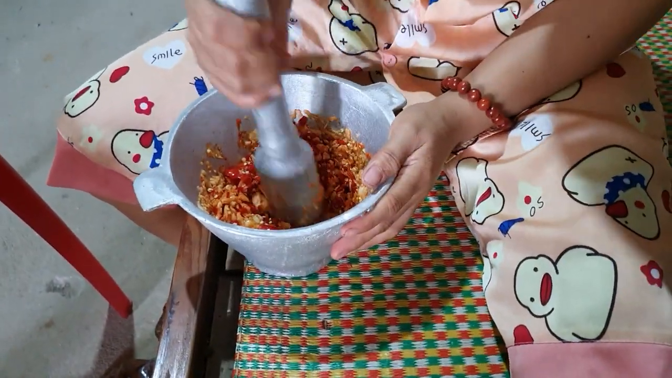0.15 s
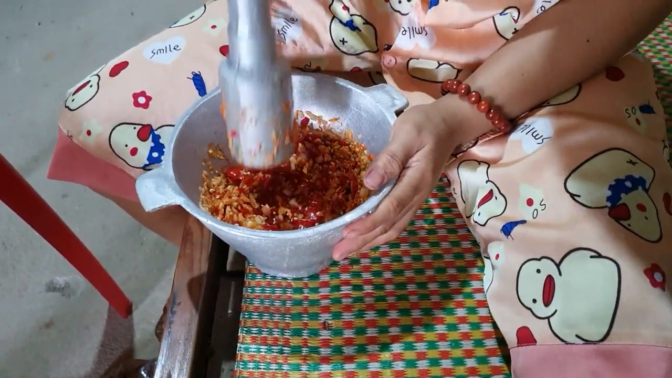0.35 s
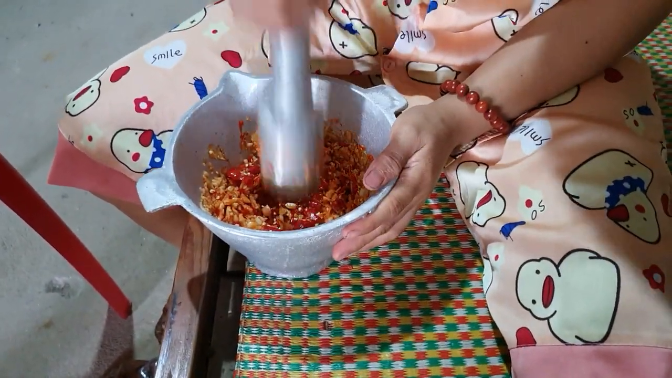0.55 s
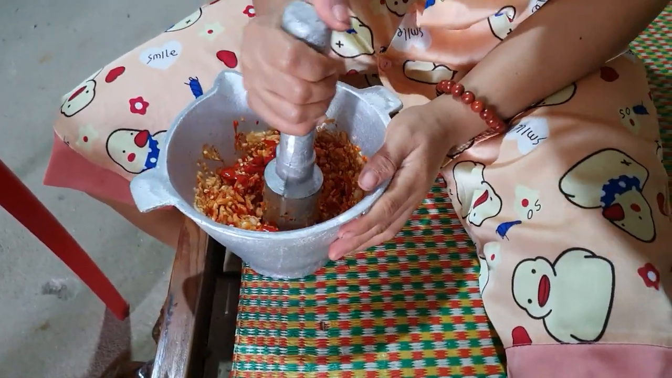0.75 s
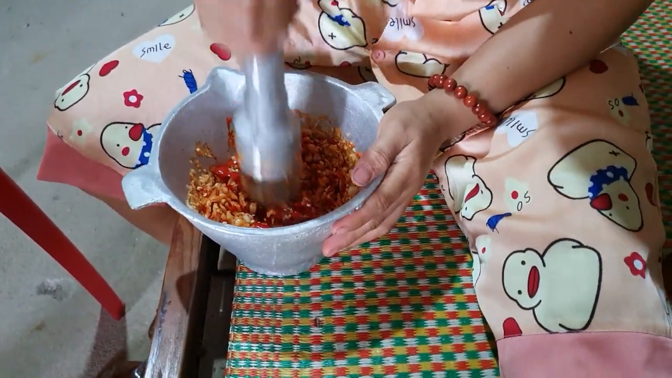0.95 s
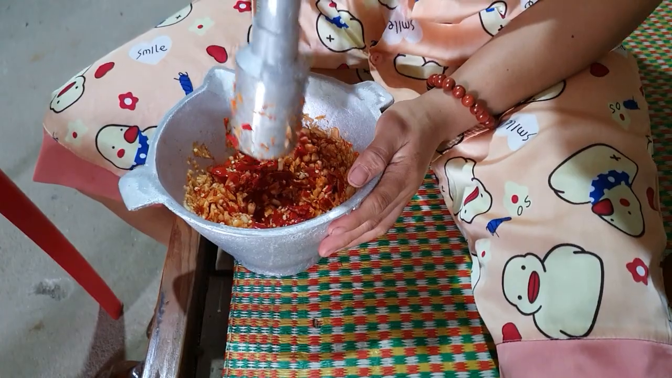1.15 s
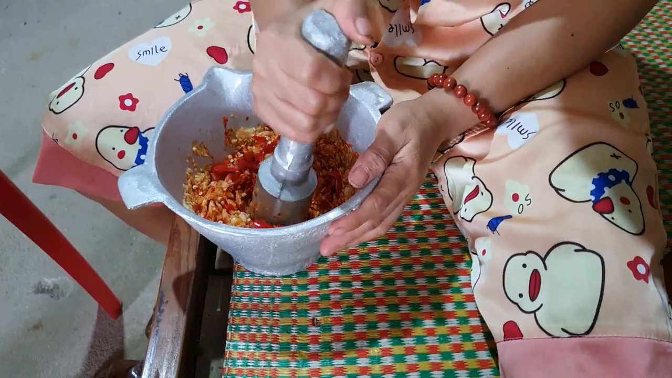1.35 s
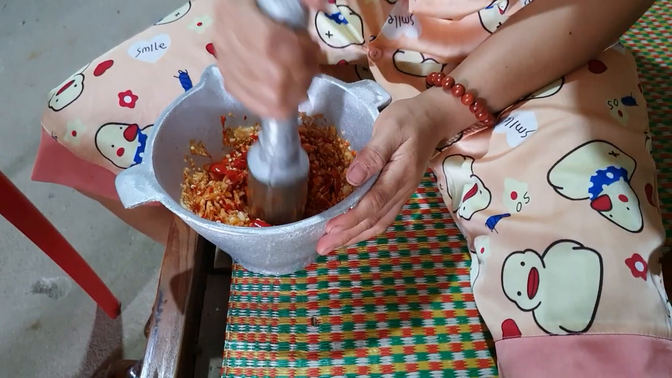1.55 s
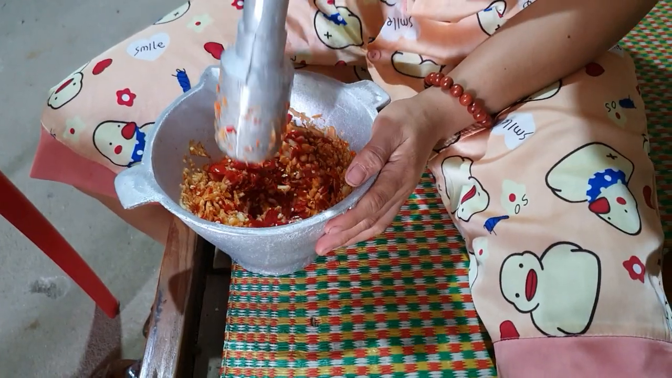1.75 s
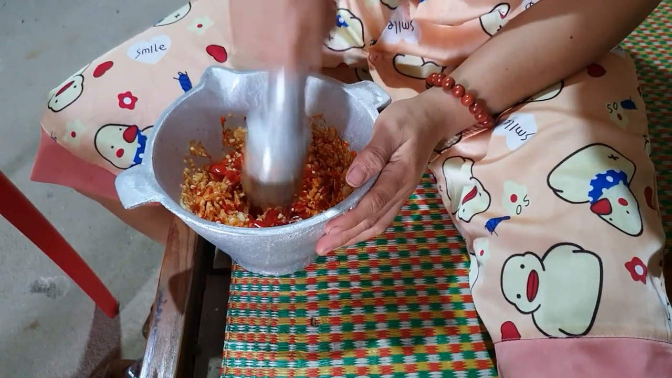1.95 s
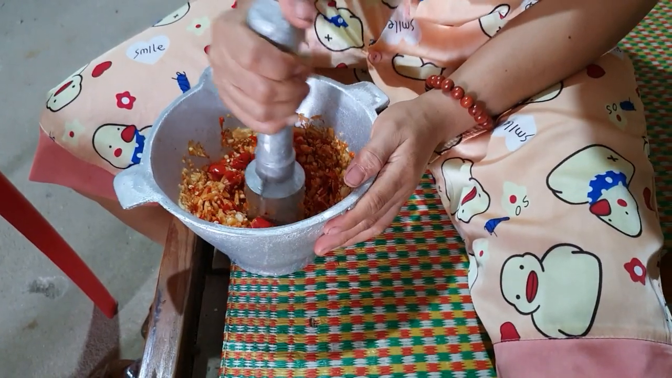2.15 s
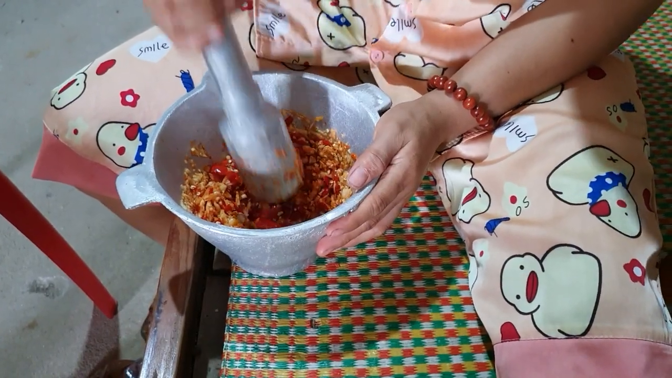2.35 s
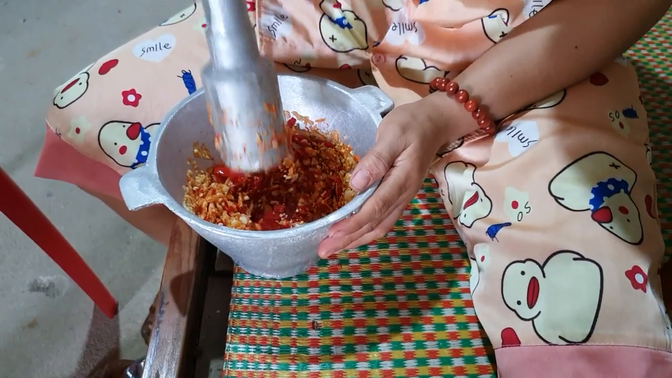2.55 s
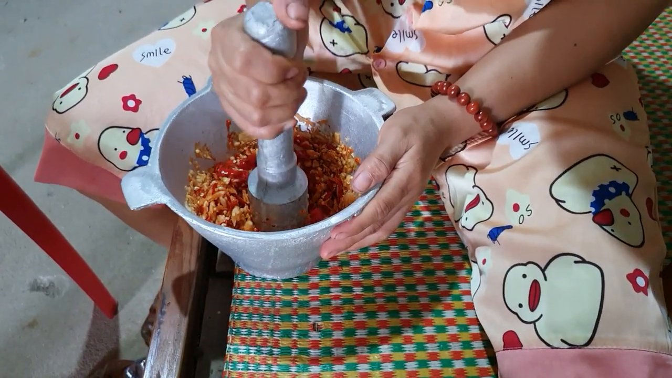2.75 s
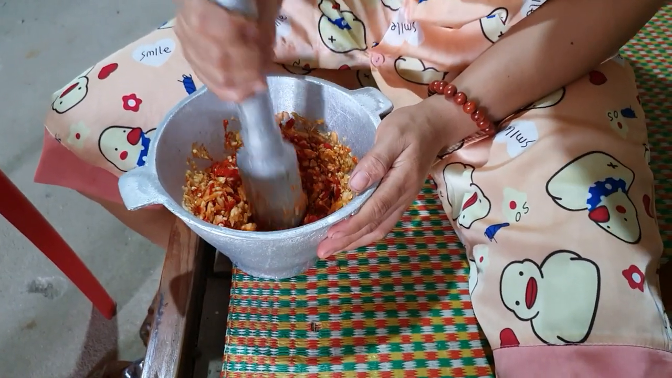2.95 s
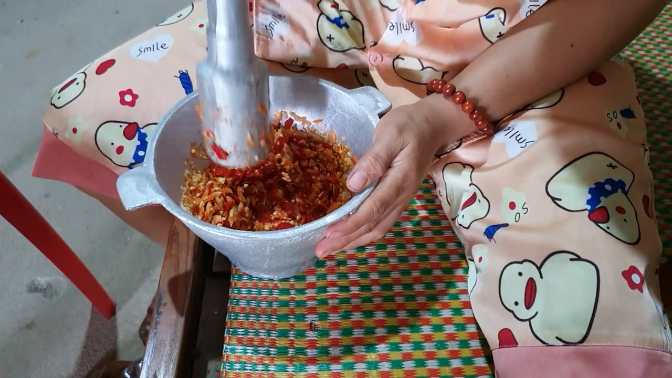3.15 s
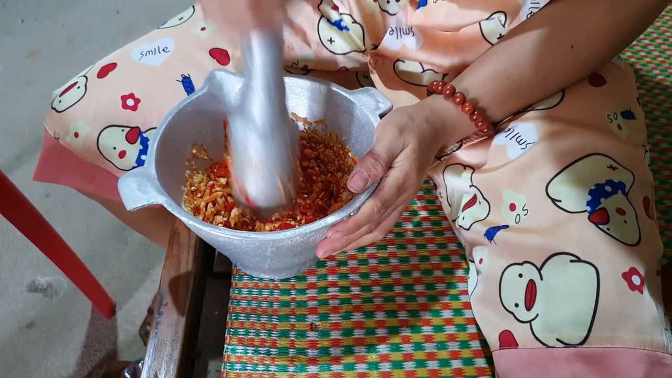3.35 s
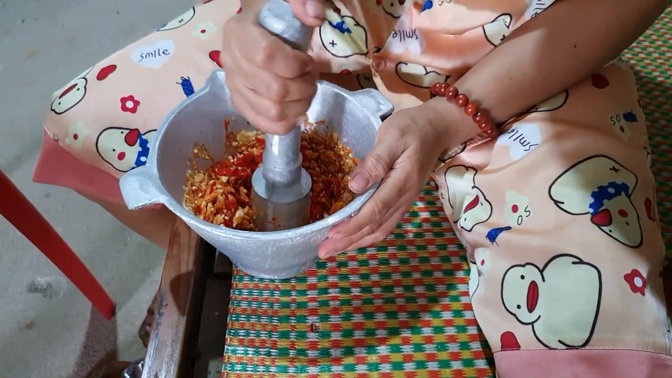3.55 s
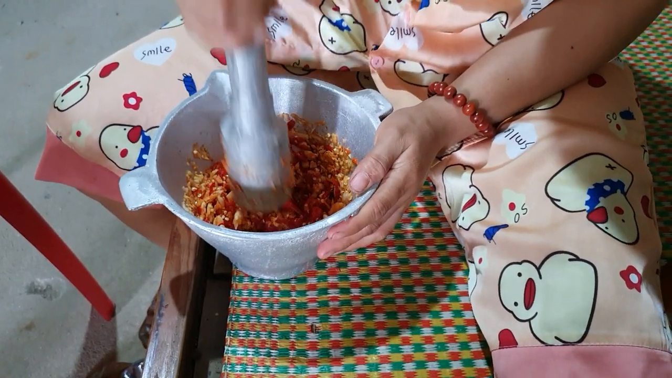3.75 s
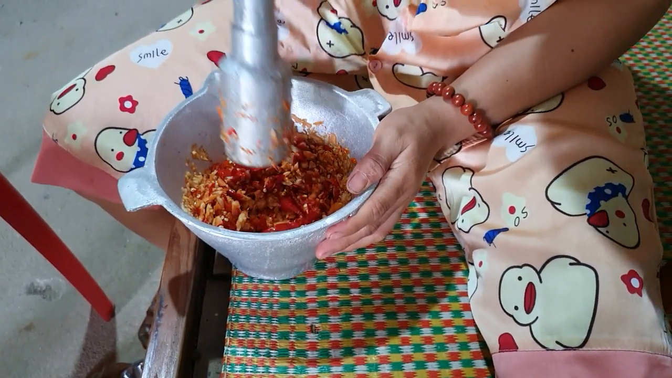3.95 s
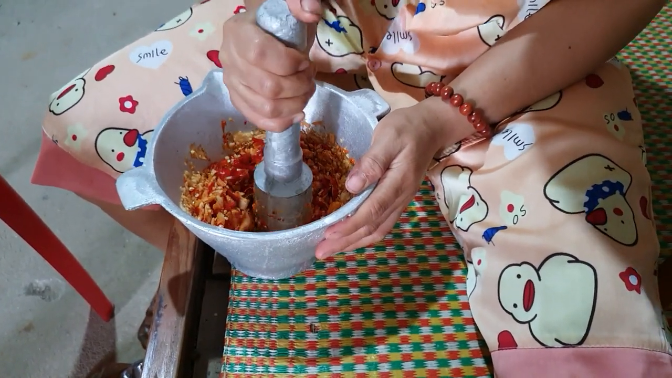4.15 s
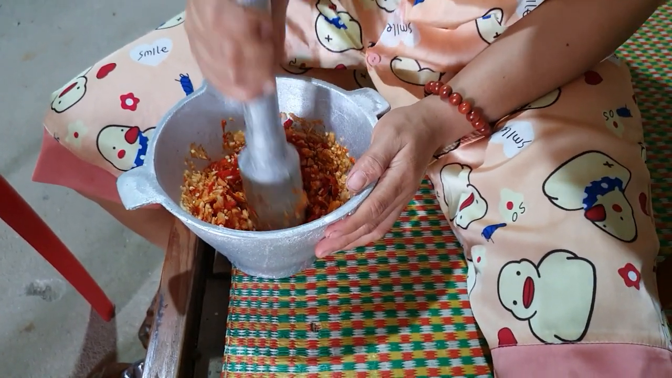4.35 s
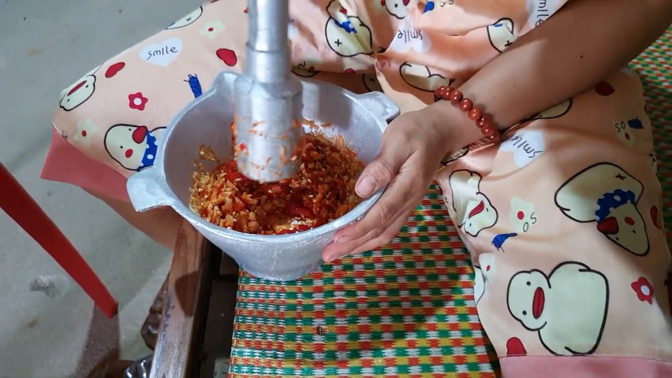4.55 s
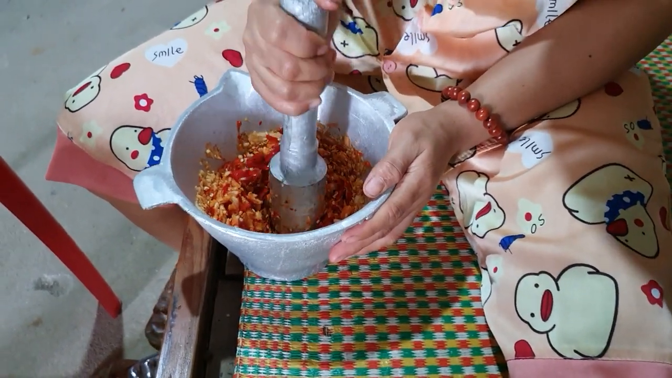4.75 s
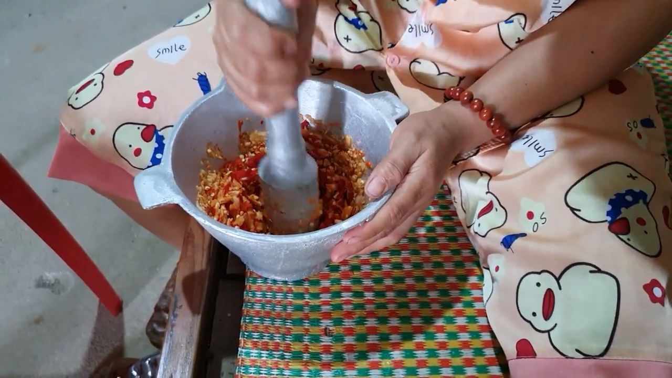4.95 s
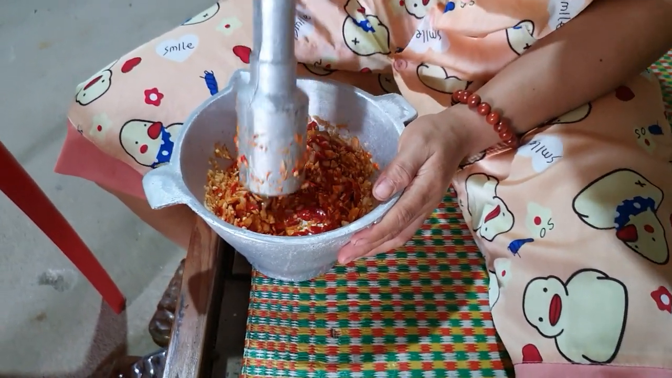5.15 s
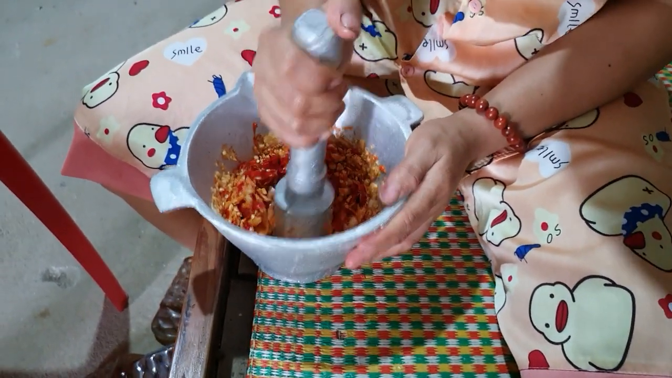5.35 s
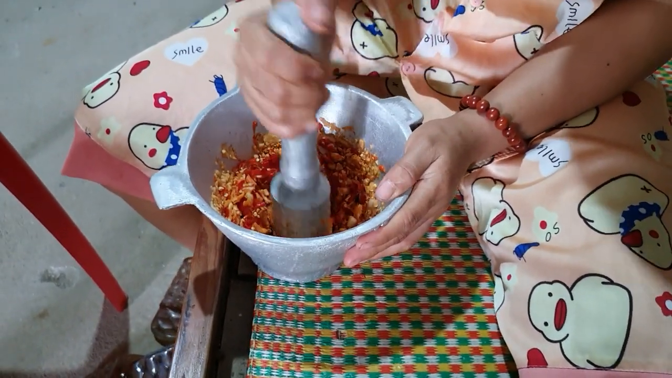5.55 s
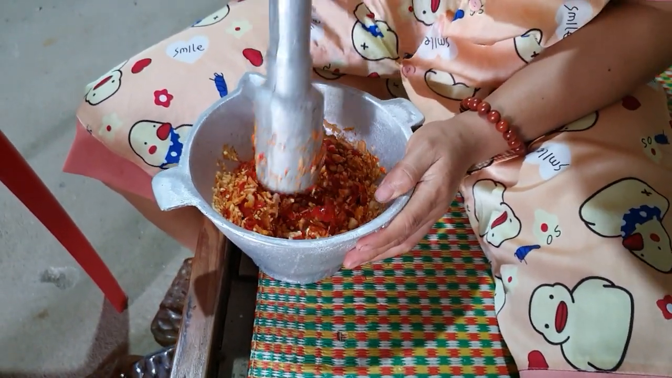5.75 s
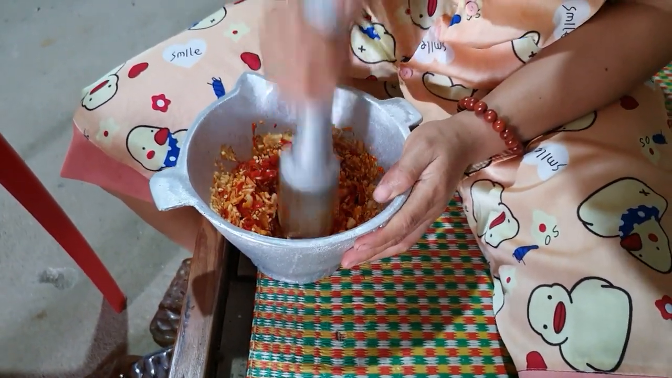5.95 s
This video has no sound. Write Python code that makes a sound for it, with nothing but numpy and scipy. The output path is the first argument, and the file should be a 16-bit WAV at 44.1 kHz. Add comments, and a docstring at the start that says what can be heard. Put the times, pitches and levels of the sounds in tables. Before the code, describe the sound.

A metal pestle pounds sticky paste in a cast metal mortar, heard closely in stereo in a bare room with a diffuse tail of roughly half a second. Soft air rush and deep bench rumble open, with small bumps around 0.3 s. A heavy dull thud lands at 0.6 s, followed by a wet smack. Blows at 1.3 and 2.0 s hit harder, with clank, bright scrape and brief metallic ring, the latter brightest. At 2.7 and 3.4 s the strokes are much quieter and cushioned, the second with a low hollow plop. Heavy squelching thuds come at 4.1 and 4.7 s, each trailed by sticky smacks. A soft, muffled blow with a plop follows at 5.3 s, a bench bump at 5.7 s, then a firm, crisp wet thud near 6.0 s as it ends. The loudest hits are slightly squashed, and the rumble swells around the strokes.

```python
"""Pounding chilli paste, small stereo

Bare room, mat-covered wooden bench: a metal pestle pounds paste in a hand-steadied cast metal mortar.
Each blow squelches (crowded noise bursts) and thuds (struck modes behind a cushioning low-pass);
where the paste is thin, the contact is hard and the metal rings (longer modes and a bright scrape).
Paste smacks and plops, and coloured noise makes the air's rush and the rumble of a bench that also bumps.
The room answers with a diffuse tail; the recorder's limiter ducks the loudest blows.
"""
import sys
import numpy as np
from scipy import signal
from scipy.fft import rfft, irfft, next_fast_len
from scipy.io import wavfile
from scipy.ndimage import uniform_filter1d, minimum_filter1d, map_coordinates

SR = 44100
rng = np.random.default_rng(int(sys.argv[2]) if len(sys.argv) > 2 else 0)


def bounce(signal):
    """Save signal as a 16-bit WAV file at the path given by the first command-line argument."""
    frames = np.transpose(np.atleast_2d(signal))
    limited = np.clip(frames, -1, 1)
    pcm = np.round(limited * 32767).astype(np.int16)
    wavfile.write(sys.argv[1], SR, pcm)


N = 268339  # samples


def amp(db):
    """Decibels as an amplitude factor."""
    return 10 ** (np.asarray(db) / 20)


def unit(x):
    """Scale to an RMS of one."""
    return x / np.sqrt(np.mean(x ** 2) + 1e-20)


def along(points, hz):
    """Interpolate (f/Hz, value) points on a log frequency axis."""
    f, value = np.transpose(points)
    return np.interp(np.log(hz + 1), np.log(f + 1), value)


def curve(rows):
    """Interpolate (t/s, value) rows to one value per sample."""
    return np.interp(np.arange(N) / SR, *np.transpose(rows))


def wobble(rate):
    """A smooth random curve with rate knots a second."""
    knots = rng.standard_normal(int(N * rate / SR) + 4)
    return map_coordinates(knots, [np.arange(N) * rate / SR])


def filtered(x, response):
    """Multiply the spectrum of x by a response of frequency."""
    n = x.shape[-1]
    padded = next_fast_len(n + 8192)
    spectrum = rfft(x, padded) * response(np.fft.rfftfreq(padded, 1 / SR))
    return irfft(spectrum, padded)[..., :n]


def stereo(pair, spectrum, alike):
    """Two unrelated signals become a coloured, partly alike left and right."""
    def mid_side_gains(hz):
        turn = np.arccos(np.clip(along(alike, hz), -1, 1)) / 2
        return amp(along(spectrum, hz)) * np.array([np.cos(turn), np.sin(turn)])

    mid, side = filtered(pair, mid_side_gains)
    return np.array([mid + side, mid - side])


def add(track, s, sound):
    """Mix a sound in at s seconds."""
    start = round(s * SR)
    track[:, start:start + sound.shape[-1]] += sound[..., :N - start]


def ring(modes, scatter_db, spread, chatter=0):
    """One second of decaying struck modes of alternating sign; chatter blurs each pitch by that share.

    The spread scatters the phase between left and right, in radians at 1 kHz.
    """
    t = np.arange(SR) / SR
    out = np.zeros((2, SR))
    for k, (hz, db, t60) in enumerate(modes):
        size, side = rng.standard_normal(2)
        lead = spread * side * np.sqrt(hz / 1000) * np.array([[1], [-1]])
        drift = np.cumsum(rng.standard_normal(SR)) * np.sqrt(2 * np.pi * chatter * hz / SR)
        decay = amp(db + scatter_db * size - 60 * t / t60)
        out += (-1) ** k * decay * np.sin(2 * np.pi * hz * t + drift + lead)
    return out


# Level of the background, moving rush and rumble together: t/s, level/dB
BACKGROUND = [(0, -46.5), (1.25, -42.5), (1.7, -48.5), (2.55, -51.5), (3.15, -51), (3.9, -43), (6.08, -44)]
# Colour of the rush in the air: f/Hz, level/dB
AIR = [(88, -29), (150, -8.5), (286, -8.5), (457, -1), (702, -7), (774, -9.5), (923, -5), (1260, -15.5),
       (1390, -15), (2550, -21), (4580, -25.5), (5570, -31.5), (8560, -35), (11300, -41), (16000, -53)]


def air():
    """A soft background rush whose low part swells and sinks a little."""
    alike = [(200, 0.31), (600, 0.72), (2000, 0.032), (8000, 0.036)]  # f/Hz, left-right likeness
    rush = unit(stereo(rng.standard_normal((2, N)), AIR, alike))
    low = filtered(rush, lambda hz: 1 / (1 + (hz / 700) ** 4))
    restless = low * amp(0.57 * wobble(18) + 1.3 * wobble(5.1))
    return amp(curve(BACKGROUND)) * (restless + rush - low)


SWELL_S = 0.062  # time for a swell to fall to 1/e on either side
SWELL_GROWS = 0.35  # dB of swell height per dB by which the thud outweighs the ring
DULL_DB = 32  # that outweighing in an ordinary blow


def swells(offset):
    """A smooth swell offset seconds from every blow, higher where the blow is deep and dull."""
    t = np.arange(N) / SR
    out = np.zeros(N)
    for s, thud_db, _, _, metal_db, *_ in BLOWS:
        height = amp(SWELL_GROWS * (thud_db - metal_db - DULL_DB))
        out += height * np.exp(-((t - s - offset) / SWELL_S) ** 2)
    return out


# The bench rumbles most as the arm tops its lift and again just after the blow.
RUMBLE_DB = 3.5  # over the mean background level, before the swells
RUMBLE_FOLLOWS = 0.88  # share of the background's level change that the rumble takes
LIFT_DB, LIFT_LEAD_S = 5.5, 0.26
ROCK_DB, ROCK_LAG_S = 6, 0.066
# Colour of the bench rumble: f/Hz, level/dB
RUMBLE = [(12, -33), (22, -12), (50, -1), (76, 4), (107, -1.5), (170, -10.5), (290, -21), (450, -28),
          (800, -86)]
# The clearest bumps and creaks of the bench: t/s, relative level/dB, pitch f/Hz, t60/s
BUMPS = [(0.278, -22, 84, 0.041), (0.339, -20, 74.5, 0.054), (0.374, -26.5, 77, 0.14),
         (1.924, -31, 86, 0.052), (3.849, -22.5, 161.4, 0.047), (4.3, -32.5, 303.4, 0.14),
         (5.164, -26, 163, 0.042), (5.736, -17.5, 80.5, 0.029)]
# The boards under a bump: multiple of its pitch, level/dB
BOARDS = [(1, 1), (1.85, -7.5), (3.1, -10.5)]


def bench():
    """The bench rumbles as the cook's weight shifts with every lift and blow, and now and then it bumps."""
    background_db = curve(BACKGROUND)
    mean_db = background_db.mean()
    rest_db = RUMBLE_DB + mean_db + RUMBLE_FOLLOWS * (background_db - mean_db)
    stroke_db = LIFT_DB * swells(-LIFT_LEAD_S) + ROCK_DB * swells(ROCK_LAG_S)
    alike = [(40, 0.58), (90, 0.19), (200, 0.12)]  # f/Hz, left-right likeness
    rumble = stereo(rng.standard_normal((2, N)), RUMBLE, alike)
    unsteady = unit(rumble * amp(3 * wobble(22) + 2.4 * wobble(11)))
    out = amp(rest_db + stroke_db) * unsteady
    soft = 1 - np.exp(-np.arange(SR) / SR / 0.0035)  # the mat cushions each bump
    for s, db, hz, t60 in BUMPS:
        modes = [(hz * multiple, db + 3 + level, t60) for multiple, level in BOARDS]
        boards = ring(modes, scatter_db=1.5, spread=0.77)
        add(out, s, in_room(soft * boards, wet_db=-4.5))
    return out


# Reverberation time of the bare room: f/Hz, t60/s
ROOM_T60 = [(100, 0.5), (700, 0.62), (2000, 0.69), (5000, 0.5), (13000, 0.44)]
# Colour of the room's answer: f/Hz, level/dB
ROOM_COLOUR = [(60, 3), (130, -3.5), (180, -1.5), (250, -0.5), (320, -3.5), (480, -3), (680, -5),
               (1100, -13.5), (1700, -12.5), (2600, -5), (4000, -10), (6000, -11.5), (14000, -7)]
# Left-right likeness of the room's answer: f/Hz, likeness
ROOM_ALIKE = [(150, 0.95), (400, 0.92), (800, 0), (4000, 0)]


def room_tail():
    """One second of diffuse reverberation, of energy 1 before its colour; the upper middle lasts longest."""
    hz, t, z = signal.stft(rng.standard_normal((2, SR)), SR, nperseg=256)
    decay = amp(-60 * t / along(ROOM_T60, hz)[:, None])
    tail = signal.istft(z * decay, SR, nperseg=256)[1][:, :SR]
    tail *= 1 - np.exp(-(np.arange(SR) / SR / 0.001) ** 2)  # the walls take a moment to answer
    return stereo(tail / np.linalg.norm(tail[0]), ROOM_COLOUR, ROOM_ALIKE)


def in_room(sound, wet_db):
    """A sound and the room's answer to it."""
    answer = signal.fftconvolve(sound, room_tail(), axes=1)[:, :sound.shape[1]]
    return sound + amp(wet_db) * answer


SQUELCH_LEAD_S = 0.04  # a squelch peaks this long after its own start
# Colour of the wet paste: f/Hz, level/dB
PASTE = [(200, -1), (700, 2.5), (1150, -5.5), (1550, 1.5), (1850, 1.5), (2200, 0), (2900, -3.5),
         (4100, -3.5), (5300, -7.5), (7300, -13.5), (9200, -12.5), (13000, -21.5), (16000, -27)]
# Left-right likeness of the paste and the scrape: f/Hz, likeness
PASTE_ALIKE = [(1000, 0.65), (4000, 0.79), (8000, 0.36), (14000, 0.17)]


def squelch(rise, fall, grain_db, tilt_db, wet_db):
    """Tiny wet bursts swell to a peak, then die away; the room blends them into an even wash."""
    t = np.arange(SR) / SR - SQUELCH_LEAD_S
    bursts = rng.standard_normal((2, SR)) * amp(grain_db * rng.standard_normal(SR))
    swell = np.exp(-np.where(t < 0, (t / rise) ** 2, t / fall))
    colour = [(hz, db + tilt_db * np.log2(hz)) for hz, db in PASTE]
    direct = unit(stereo(bursts, colour, PASTE_ALIKE) * swell) / np.sqrt(SR)

    def delayed_colour(hz):
        return unit(amp(along(colour, hz))) * np.exp(-2j * np.pi * hz * SQUELCH_LEAD_S)

    wash = filtered(room_tail(), delayed_colour)
    return np.linalg.norm(swell) * (direct + amp(wet_db) * wash)


def radiated(thud, low_hz, delay, echo_db):
    """A small bowl radiates little deep bass; the floor throws back a close echo."""
    high_pass = signal.butter(2, low_hz, "high", fs=SR, output="sos")
    direct = signal.sosfilt(high_pass, thud)
    return filtered(direct, lambda hz: 1 + amp(echo_db) * np.exp(-2j * np.pi * hz * delay))


# The mortar shoved into the bench: f/Hz, level/dB, t60/s
THUD = [(182, -15, 0.026), (319, -22.5, 0.058), (425, -16, 0.019), (580, -34, 0.013)]
# The hand-damped bowl, a short clank and a few lingering modes: f/Hz, level/dB, t60/s
BOWL = [(758.6, -3.5, 0.021), (1033, 0, 0.0068), (1243, -9.5, 0.016), (1528, -6.5, 0.01),
        (2270, -18.5, 0.0084), (3230, -11.5, 0.013), (561.6, -38.5, 0.46), (656, -34, 0.21),
        (710, -34.5, 0.71), (797, -35, 0.6)]


def mortar(thud_db, clank_db, hard_hz):
    """The bench thud and bowl clank sound up to the pitch that the paste's cushion lets through."""
    thud = amp(thud_db) * ring(THUD, scatter_db=2.5, spread=0.2)
    clank = amp(clank_db) * ring(BOWL, scatter_db=3, spread=0.28, chatter=0.0036)
    cushion = signal.butter(4, min(hard_hz, SR / 4), fs=SR, output="sos")
    cushioned = signal.sosfilt(cushion, thud - clank)
    return radiated(cushioned, low_hz=111, delay=0.004866, echo_db=-10.5)


SCRAPE_DB, SCRAPE_T60_S = -6, 0.017  # metal grating on metal, relative to the bare-metal ring


def scrape():
    """A brief bright noise spray as the pestle skids on the bare bowl."""
    colour = [(1000, 0.5), (2500, -8), (3700, -5), (4800, -8.5),
              (6000, -12), (7500, -11), (11000, -15), (15000, -24)]  # f/Hz, level/dB
    spray = stereo(rng.standard_normal((2, SR)), colour, PASTE_ALIKE)
    return amp(SCRAPE_DB - 60 * np.arange(SR) / SR / SCRAPE_T60_S) * unit(spray)


# Ring of the bare metal: f/Hz, level/dB, t60/s
METAL = [(1103, -22.5, 0.48), (1375, -12.5, 0.16), (1577, -19, 0.22), (1790, -24, 0.075),
         (2195, -14.5, 0.12), (2564, -18.5, 0.16), (4024, -11.5, 0.14), (4017, -16, 0.091),
         (5970, -5, 0.022), (5950, -6, 0.019), (8270, -16.5, 0.03), (9180, -20, 0.031), (11000, -26, 0.016),
         (11700, -19, 0.025)]


def bare_metal(metal_db):
    """Hard contact sets the metal's modes ringing, blurred by rubbing, with a scrape on top."""
    modes = ring(METAL, scatter_db=0.5, spread=0.32, chatter=0.02)
    return amp(metal_db) * (modes + scrape())


def crackle(rate, fade, size_db):
    """Seeds and skins go on cracking under the pestle's weight, rate a second, ever fainter."""
    t = np.arange(SR) / SR
    struck = rng.random(SR) < rate / SR
    cracks = struck * amp(size_db * rng.standard_normal(SR)) * rng.standard_normal((2, SR))
    return unit(stereo(cracks, PASTE, PASTE_ALIKE)) * np.exp(-t / fade)


REBOUND_S, REBOUND_DB = 0.011, -9  # the pestle settles into the paste a second time
# Blows, with relative levels: t/s, thud level/dB, clank level/dB, contact hardness f/Hz,
# metal ring level/dB, squelch level/dB, squeeze time t/s, squelch tilt/(dB/octave), room level/dB
BLOWS = [(0.605, 6.5, 15, 294, -24.5, -26, 0.0018, 0, -1),
         (1.2932, 4, 7, 2070, -12.5, -22, 0.00062, -3.5, 3.5),
         (1.995, 1, 8, 2470, -7, -20.5, 0.00081, -1.5, 6), (2.678, -21, -31, 298, -37, -36.5, .0046, 0, 0),
         (3.417, -19.5, -23, 305, -58, -35.5, 0.0072, 0.5, 3.5),
         (4.084, 10, -5.5, 990, -21, -15, 0.0016, -0.5, -2.5),
         (4.7165, 10.5, -4.5, 1100, -19.5, -21.5, 0.00202, -0.5, -3),
         (5.336, -13, -27, 347, -26.5, -27, 0.0033, 0.5, 3),
         (5.9660, 3.5, 2.5, 1080, -22.5, -22, 0.00063, 4.2, 3.5)]


def pestle():
    """Each blow squeezes the paste, then drives the mortar, rings the metal and cracks the seeds."""
    out = np.zeros((2, N))
    for s, thud_db, clank_db, hard_hz, metal_db, squelch_db, squeeze, tilt_db, room_db in BLOWS:
        # the paste gives way just before the pestle bottoms out
        paste = squelch(1.27 * squeeze, 1.49 * squeeze, grain_db=7.5, tilt_db=tilt_db, wet_db=1)
        add(out, s - SQUELCH_LEAD_S - 0.54 * squeeze, amp(squelch_db + 3.5) * paste)
        struck = mortar(thud_db, clank_db, hard_hz) + bare_metal(metal_db)
        add(out, s, in_room(struck, room_db))
        seeds = crackle(rate=400, fade=0.04, size_db=3)
        add(out, s, in_room(amp(squelch_db - 26) * seeds, wet_db=-2))
        settle = squelch(0.0012, 0.008, grain_db=1, tilt_db=-5, wet_db=-5)
        add(out, s + REBOUND_S - SQUELCH_LEAD_S, amp(squelch_db + REBOUND_DB) * settle)
    return out


PULL_S, PULL_DB = 0.092, -5  # a weaker smack follows each one as the pestle pulls free
# Sticky smacks as the pestle twists in the paste after a blow: t/s, relative level/dB
SMACKS = [(0.6633, -12), (2.7286, -27.5), (4.166, -19), (4.7649, -18), (5.3933, -28.5), (6.0267, -14.5)]


def smacks():
    """The sticky paste lets go of the pestle in two steps, each a short squelch."""
    out = np.zeros((2, N))
    for s, db in SMACKS:
        for delay, step_db in [(0, 0), (PULL_S, PULL_DB)]:
            smack = squelch(0.00067, 0.0034, grain_db=1.5, tilt_db=-2.5, wet_db=8)
            add(out, s + delay - SQUELCH_LEAD_S, amp(db + step_db - 14) * smack)
    return out


# Air pockets as the pestle sinks into deep paste: t/s, level/dB, pitch f/Hz, t60/s
PLOPS = [(3.412, -33, 537, 0.23), (5.335, -34, 532, 0.39)]


def plops():
    """Trapped air plops out, each pocket a single decaying resonance."""
    out = np.zeros((2, N))
    for s, db, hz, t60 in PLOPS:
        add(out, s, ring([(hz, db, t60)], scatter_db=0.5, spread=0.18, chatter=0.003))
    return out


def scene():
    """Everything that reaches the microphones."""
    return air() + bench() + pestle() + smacks() + plops()


def limiter(x, ceiling, release_db):
    """The gain drops where the level over about 2 ms is too strong and climbs back at release_db a second."""
    level = np.sqrt(np.abs(uniform_filter1d(np.mean(x ** 2, axis=0), size=89)))
    over_db = 20 * np.log10(np.maximum(level / ceiling, 1))
    climb = release_db * np.arange(N) / SR
    gain_db = climb - np.maximum.accumulate(over_db + climb)
    smooth_db = uniform_filter1d(minimum_filter1d(gain_db, size=65), size=65)
    return x * amp(smooth_db)


TOP_HZ = 16000  # the recorder's band limit


def record(dry):
    """The recorder ducks loud blows, rounds their peaks and keeps nothing above its band limit."""
    held = limiter(dry, ceiling=0.54, release_db=51.5)
    rounded = held / (1 + held ** 8) ** (1 / 8)
    return filtered(rounded, lambda hz: hz < TOP_HZ)


dry = scene()
out = record(dry)
bounce(out)
```